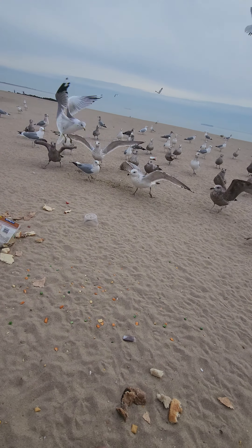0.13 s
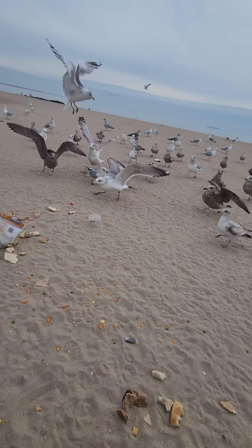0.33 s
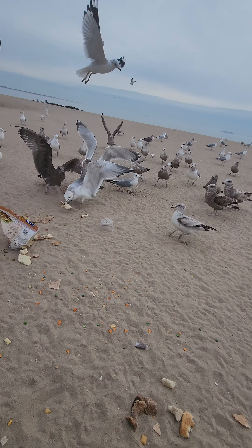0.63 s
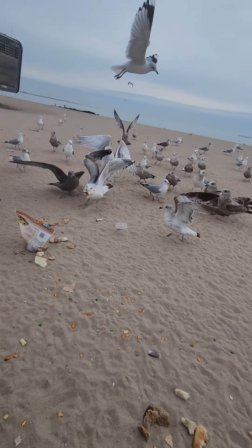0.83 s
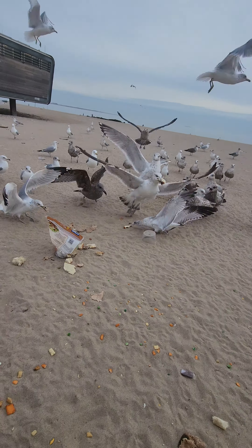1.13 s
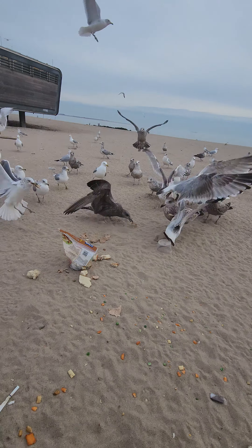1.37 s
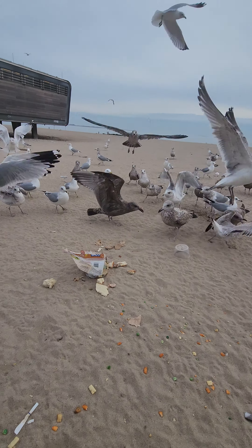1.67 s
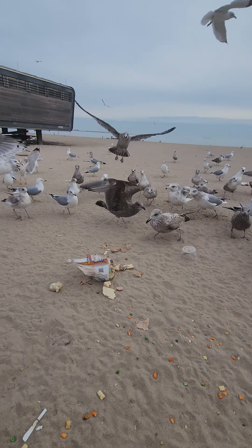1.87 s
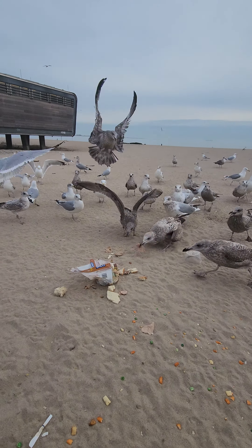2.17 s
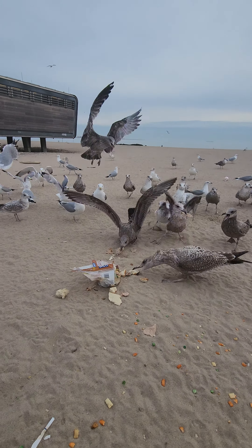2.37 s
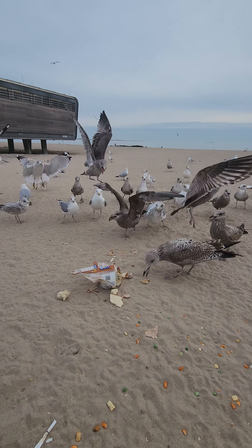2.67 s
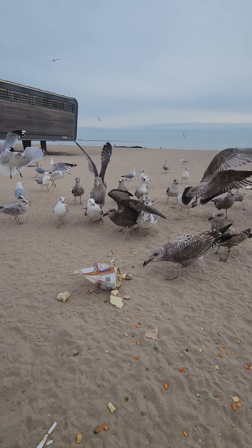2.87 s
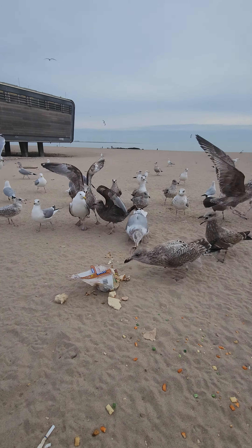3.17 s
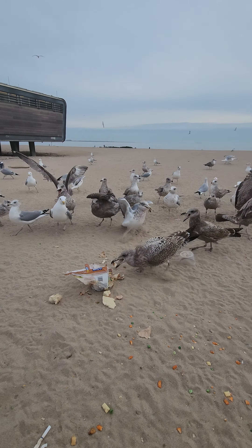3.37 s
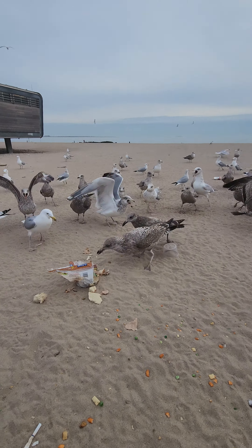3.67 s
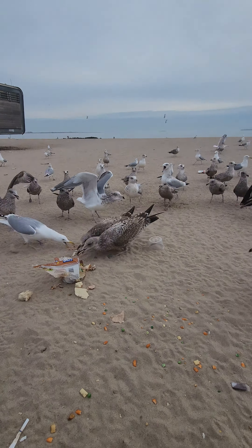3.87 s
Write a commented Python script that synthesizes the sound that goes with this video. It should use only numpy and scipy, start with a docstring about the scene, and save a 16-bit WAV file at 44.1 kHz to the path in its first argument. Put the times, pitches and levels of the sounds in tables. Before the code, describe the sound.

Gull cries, peeps, mews and raspy squawks overlap in the open air above a low wind rumble

```python
"""Gulls squabbling on a beach

Gulls squabble over scraps on an open beach, a few metres from a two-port microphone.
Wind and surf rumble underneath as filtered noise, and farther birds chatter as a blur of noise.
Whistles, peeps, mews and long piercing cries near 2 kHz are harmonic tones with unsteady pitch.
Harsh rattling rasps are rows of uneven snaps and noise puffs, ringing in a throat resonance."""
import sys
import numpy as np
from scipy import signal
from scipy.fft import rfft, irfft, next_fast_len
from scipy.io import wavfile

SR = 44100
rng = np.random.default_rng(int(sys.argv[2]) if len(sys.argv) > 2 else 0)


def int16_out(signal):
    """Quantize to a 16-bit WAV file."""
    q = np.round(np.clip(np.atleast_2d(signal).T, -1, 1) * 32767)
    wavfile.write(sys.argv[1], SR, q.astype(np.int16))


N = 176400  # samples: 4 seconds

# tone colour of the harsh voices, near and far: frequency_hz, relative_level_db
HARSH_COLOUR = [(150, -24), (300, -8), (850, -20.5), (1250, -8), (4200, -0.5), (7000, -14.5), (10000, -12),
                (15500, -13)]
# how much earlier a call reaches the left port, and how far that varies between calls (share)
LEAD_S, WHISTLE_LEAD_S, LEAD_SPREAD = 0.00014, 0.000197, 0.15
ATTACK_S, RELEASE_S = 0.0063, 0.012  # opening and closing of a call


def amp(db):
    """Turns decibels into a gain."""
    return 10 ** (np.asarray(db) / 20)


def unit(x):
    """Scales a sound to an rms (average strength) of 1."""
    return x / np.sqrt(np.mean(x ** 2) + 1e-20)


def read(points, hz):
    """Reads a (Hz, dB) curve as gains, joining its points along a logarithmic frequency axis."""
    point_hz, db = np.transpose(points)
    return amp(np.interp(np.log(hz + 1), np.log(point_hz), db))


def colour(x, gain):
    """Filters a sound by multiplying its spectrum by a gain that depends on frequency."""
    size = next_fast_len(2 * len(x))
    spectrum = rfft(x, size) * gain(np.fft.rfftfreq(size, 1 / SR))
    return irfft(spectrum, size)[:len(x)]


def wander(size, hz):
    """A smooth random curve of rms about 1, moving at rates up to about hz."""
    noise = rng.standard_normal(size + SR // 2)
    return unit(colour(noise, lambda f: np.exp(-(f / hz) ** 2)))[:size]


def gate(t):
    """The quick, smooth opening and closing of a call."""
    opening = np.sin(np.pi / 2 * np.clip(t / ATTACK_S, 0, 1))
    closing = np.sin(np.pi / 2 * np.clip((t[-1] - t) / RELEASE_S, 0, 1))
    return opening * closing


def add(mix, start_s, sound, lead_s):
    """Places a call in the mix; the sound reaches the right port slightly later than the left."""
    lag_s = lead_s * (1 + LEAD_SPREAD * rng.uniform(-1.13, 1))
    # turning the phase in step with frequency delays by a fraction of a sample
    late = colour(sound, lambda f: np.exp(-2j * np.pi * f * lag_s))
    part = mix[:, max(round(start_s * SR), 0):][:, :len(sound)]
    part += np.array([sound, late])[:, :part.shape[1]]


def syrinx(t, hz, gains, quaver, rough, flutter_db):
    """A bird's voice: pitch quavers slowly and jitters quickly, and each harmonic flutters alone."""
    hz = hz * (1 + quaver * wander(len(t), 33.8) + rough * wander(len(t), 500))
    phase = 2 * np.pi * np.cumsum(hz) / SR
    voice = 0
    for k, gain in enumerate(gains, 1):
        flutter = amp(flutter_db * wander(len(t), 54))
        audible = k * hz < SR / 2  # leave out what is too high for the sample rate
        voice = voice + gain * flutter * np.sqrt(2) * np.sin(k * phase) * audible
    return gate(t) * voice


def follow(table):
    """Turns the points of a long call into its start, time axis and control curves."""
    point_s, *columns = np.transpose(table)
    t = np.arange(0, point_s[-1] - point_s[0] + RELEASE_S + ATTACK_S / 2, 1 / SR)
    start_s = point_s[0] - ATTACK_S / 2
    return start_s, t, [np.interp(t + start_s, point_s, column) for column in columns]


def wind():
    """Low rumble of wind and surf: filtered noise, mostly shared by both ports."""
    # balance of low and high rumble: frequency_hz, relative_level_db
    rumble_colour = [(15, -51), (25, -0.5), (95, 2), (135, -3), (167, -9), (326, -15), (363, -23.5),
                     (637, -21.5), (1000, -31.5), (15000, -44)]
    # strength of the rumble before its random swells: time_s, level_db
    rumble_level = [(0.0, -38.5), (3.87, -36.5), (4.0, -38)]
    shared, left, right = [
        unit(colour(rng.standard_normal(N), lambda f: read(rumble_colour, f))) for _ in range(3)]
    level_db = np.interp(np.arange(N) / SR, *np.transpose(rumble_level))
    level = amp(level_db + 1.33 * wander(N, 14))
    return level * unit(shared + 0.34 * np.array([left, right]))


def flock():
    """Blurred chatter of birds farther away: harsh noise with a fluttering level."""
    # strength of the crowd before its flutter: time_s, level_db
    crowd_level = [(0, -75.5), (.45, -48.5), (1.0, -26.5), (2.4, -37.5), (4, -35)]
    out = np.zeros((2, N))
    level = amp(np.interp(np.arange(N) / SR, *np.transpose(crowd_level)))
    flutter = amp(3.8 * wander(N, 20))
    noise = unit(colour(rng.standard_normal(N), lambda f: read(HARSH_COLOUR, f)))
    add(out, 0, level * flutter * noise, LEAD_S)
    return out


def mews():
    """Mews and yelps: the pitch glides and bends in an arch, with up to nine harmonics."""
    # one mew a row: start_s, length_s, first_pitch_hz, last_pitch_hz, pitch_arch (share of pitch),
    # level_db (all harmonics together), tilt_db (change from each harmonic to the next)
    mew_list = [(0.278, 0.022, 1534, 1414, -0.016, -33.5, 4), (0.466, 0.073, 1497, 1340, -0.027, -31, -1),
                (0.529, 0.13, 2000, 1740, 0.1, -36, -3), (0.883, 0.21, 1151, 994, 0, -31, 0.5),
                (1.359, 0.13, 1431, 1417, 0.052, -31.5, -14), (1.696, 0.18, 1726, 1623, 0.029, -27, -3),
                (2.253, 0.12, 1300, 1297, 0.056, -31.5, -4.5),
                (2.394, 0.033, 2010, 2100, 0.0037, -23.5, -4.5),
                (2.523, 0.073, 2083, 1922, -0.0054, -25, -7.5), (2.593, .042, 1487, 1417, .17, -27, 0),
                (2.631, .05, 1261, 1382, 0.00047, -22, -5), (3.02, 0.093, 1895, 1840, 0.01, -25, -5),
                (3.573, 0.045, 1220, 1314, 0.013, -20, -4.5),
                (3.619, 0.11, 1677, 1630, -0.0079, -24.5, -10.5),
                (3.716, 0.091, 1108, 920, 0.018, -33.5, -0.5)]
    out = np.zeros((2, N))
    for start_s, length_s, first_hz, last_hz, arch, db, tilt_db in mew_list:
        t = np.arange(0, length_s, 1 / SR)
        glide = first_hz + (last_hz - first_hz) * t / length_s
        hz = glide * (1 + arch * np.sin(np.pi * t / length_s))
        k = np.arange(9)
        # harmonics above about 6500 Hz fade out
        gains = amp(tilt_db * k) / (1 + (first_hz * (k + 1) / 6500) ** 6)
        gains = amp(db) * gains / np.linalg.norm(gains)
        add(out, start_s, syrinx(t, hz, gains, quaver=0.0049, rough=0.0096, flutter_db=2.0), LEAD_S)
    return out


def peeps():
    """Short thin peeps: the pitch glides straight, and the higher harmonics are weak."""
    # one peep a row: start_s, length_s, first_pitch_hz, last_pitch_hz,
    # level_db (the harmonics are set above or below it)
    peep_list = [(0.306, 0.043, 3530, 3410, -39), (0.325, 0.12, 4020, 3944, -46.5),
                 (0.434, 0.08, 4440, 4620, -31), (0.481, 0.058, 4330, 4000, -30),
                 (0.559, 0.048, 4500, 4350, -31), (0.603, .135, 3750, 3540, -32.5),
                 (0.608, .1, 2350, 2328, -37.5), (0.701, .23, 2963, 3095, -33.5),
                 (0.744, .14, 3964, 3920, -32), (1.755, 0.062, 2730, 2583, -30),
                 (2.388, .11, 3150, 3230, -38), (2.539, 0.32, 3827, 3708, -31),
                 (2.67, .36, 3135, 3100, -35.5), (3.522, 0.095, 3280, 3070, -32),
                 (3.763, 0.053, 2790, 2665, -34.5)]
    out = np.zeros((2, N))
    for start_s, length_s, first_hz, last_hz, db in peep_list:
        t = np.arange(0, length_s, 1 / SR)
        hz = first_hz + (last_hz - first_hz) * t / length_s
        gains = amp(db + np.array([4.5, -10, -14, -15]))
        add(out, start_s, syrinx(t, hz, gains, quaver=0.006, rough=0.006, flutter_db=4.5), LEAD_S)
    return out


def whistles():
    """A young gull's begging whistles, off to the left: high, quavering, with three harmonics."""
    # one table a whistle, its points in order: time_s, pitch_hz, fundamental_level_db
    whistle_list = [
        [(.525, 4280, -31), (.56, 4010, -17), (.593, 3840, -27)],
        [(0.594, 4650, -21), (0.682, 4980, -31), (0.943, 4743, -19.5)],
        [(.945, 3883, -19.5), (1.02, 3675, -23.5), (1.055, 3880, -19), (1.1, 3650, -24)],
    ]
    out = np.zeros((2, N))
    for table in whistle_list:
        start_s, t, (hz, db) = follow(table)
        gains = [amp(db), amp(db - 7.5), amp(db - 16)]
        voice = syrinx(t, hz, gains, quaver=0.00694, rough=0.0069, flutter_db=2.0)
        add(out, start_s, voice, WHISTLE_LEAD_S)
    return out


def rasps():
    """Uneven snaps of the syrinx, each with a puff of noise, ring in a wide throat resonance."""
    # one rasp a row: start_s, length_s, level_db, throat_resonance_hz
    rasp_list = [(0.621, 0.41, -33, 4330), (1.084, 0.058, -22.5, 5460), (1.129, 0.36, -24.5, 3060),
                 (1.47, 0.17, -21, 2820), (1.833, 0.076, -24, 2800), (1.936, 0.029, -25, 3340),
                 (1.991, 0.033, -26.5, 2730), (2.028, 0.14, -33.5, 3400), (2.201, 0.067, -24, 2580),
                 (2.294, .06, -22, 2460), (2.614, 0.064, -19, 2830), (2.82, .21, -24, 2450),
                 (3.079, .15, -26, 2830), (3.336, 0.067, -27, 2220), (3.43, 0.087, -23.5, 2330),
                 (3.598, .2, -31.5, 3020), (3.891, .13, -29, 2950)]
    rate_hz, jitter, breath = 320, 0.1, 0.32  # typical snap rate, its unevenness, share of puffs
    throat_width_hz, throat_db = 1370, 13.5
    out = np.zeros((2, N))
    for start_s, length_s, db, throat_hz in rasp_list:
        t = np.arange(0, length_s, 1 / SR)
        unevenness = wander(len(t), 25) + wander(len(t), 300)
        turns = np.cumsum(rate_hz * np.exp(jitter * unevenness)) / SR
        # one snap for each whole turn; a puff dies away within each turn
        snaps = np.diff(np.floor(turns), prepend=0) * amp(1.95 * wander(len(t), 170))
        puffs = np.exp(-(turns % 1) / 0.38) * rng.standard_normal(len(t))
        drive = unit(snaps) * (1 - breath) + unit(puffs) * breath
        # a very short noisy ring, its spectrum partly evened out, blurs each snap
        ring = np.exp(-t / 0.00064) * rng.standard_normal(len(t))
        even_ring = colour(ring, lambda f: 1 / np.sqrt(abs(rfft(ring, 2 * len(f) - 2)) + 1e-6))
        drive = signal.fftconvolve(drive, unit(even_ring))[:len(t)]

        def throat(f):
            """Boosts a wide band around the throat resonance, on top of the harsh colour."""
            boost_db = throat_db / (1 + ((f - throat_hz) / throat_width_hz) ** 2)
            return read(HARSH_COLOUR, f) * amp(boost_db)

        voice = colour(drive, throat) * gate(t) * amp(3.2 * wander(len(t), 38))
        add(out, start_s, amp(db) * unit(voice), LEAD_S)
    return out


def cries():
    """Long held cries: a strong fundamental and octave; louder cries quaver less."""
    # one table a cry, its points in order: time_s, pitch_hz, fundamental_level_db, octave_level_db
    cry_list = [
        [(1.08, 2225, -21, -26), (1.348, 2046, -26, -29), (1.72, 2154, -27, -27.5)],
        [(1.81, 2004, -22.5, -21.5), (2.12, 2001, -18.5, -19.5), (2.19, 1915, -23.5, -34)],
        [(2.672, 2132, -21.5, -21.5), (3.09, 2017, -18, -24), (3.205, 1985, -22.5, -30)],
        [(3.612, 2060, -18, -26.5), (3.658, 2078, -16, -17), (3.76, 2152, -22.5, -40)],
        [(3.803, 2100, -19, -18), (3.819, 2067, -16.5, -17.5), (3.99, 1973, -28, -23.5)],
    ]
    # harmonics 3 to 7, one value each: level_db relative to the octave
    overtones_db = [-19.5, -20, -22, -19, -26]
    out = np.zeros((2, N))
    for table in cry_list:
        start_s, t, (hz, db, octave_db) = follow(table)
        gains = [amp(db), amp(octave_db)] + [amp(octave_db + d) for d in overtones_db]
        # the quaver shrinks for cries whose average level is above -23.5 dB
        shaky = amp(-np.maximum(np.mean(db) + 23.5, 0))
        voice = syrinx(t, hz, gains, quaver=0.00906 * shaky, rough=0.0045, flutter_db=1.12)
        add(out, start_s, voice, LEAD_S)
    return out


def beach(x):
    """Faint, short scatter from the sand and the nearby structure: a fading noise echo."""
    t = np.arange(SR // 2) / SR
    tail = rng.standard_normal((2, len(t))) * amp(-60 * t / 0.26)  # falls 60 dB in 0.26 s
    tail = tail / np.linalg.norm(tail[0])
    return amp(-12) * signal.fftconvolve(x, tail, axes=1)[:, :N]


def scene():
    """All the birds, their scatter and the wind."""
    birds = flock() + mews() + peeps() + whistles() + rasps() + cries()
    return birds + beach(birds) + wind()


def record(dry):
    """Each port has its own peaks and notches; then a low-pass filter removes the top treble."""
    # response of each microphone port: frequency_hz, gain_db
    left_port = [(7000, 6), (8200, 0), (8800, -33), (9700, -3)]
    right_port = [(500, 5.5), (1200, -0.5), (2050, 6.5), (3000, -4), (6600, 8), (7500, 2.5), (8100, -58),
                  (9400, -33), (10200, -36), (12000, -0.5), (15000, -24)]
    left = colour(dry[0], lambda f: read(left_port, f))
    right = colour(dry[1], lambda f: read(right_port, f))
    low_pass = signal.firwin(511, 15900, window=("kaiser", 9), fs=SR)  # cutoff in Hz
    return signal.oaconvolve(np.array([left, right]), low_pass[None], "same")


dry = scene()
out = record(dry)
int16_out(out)
```